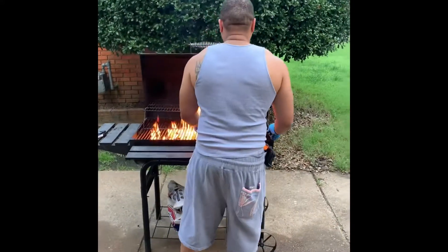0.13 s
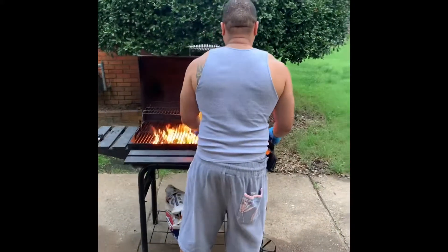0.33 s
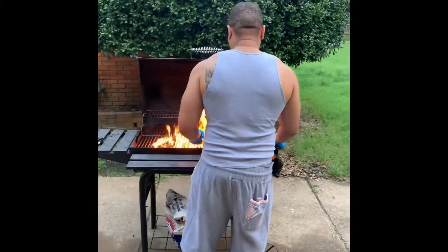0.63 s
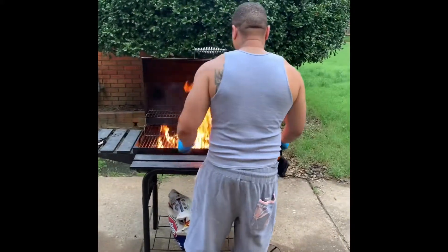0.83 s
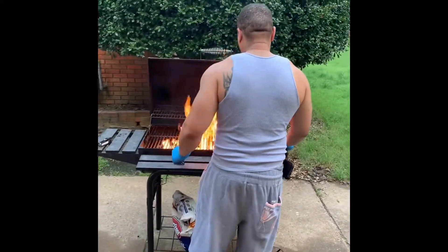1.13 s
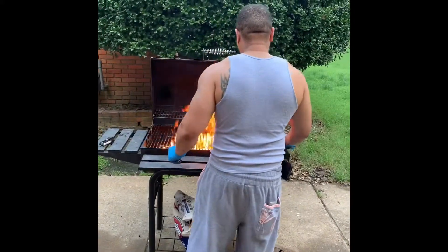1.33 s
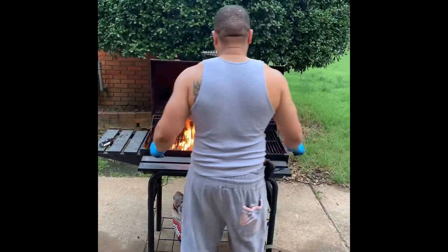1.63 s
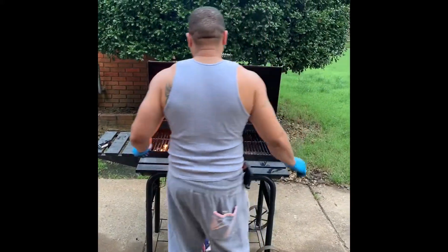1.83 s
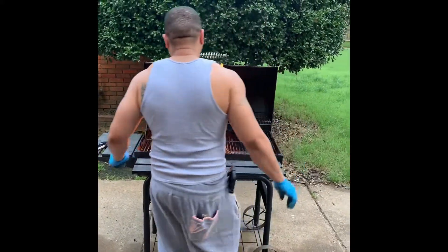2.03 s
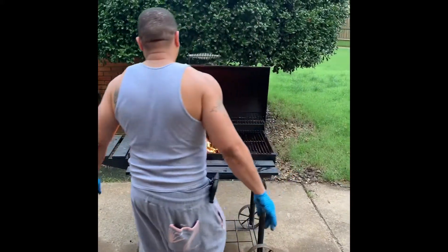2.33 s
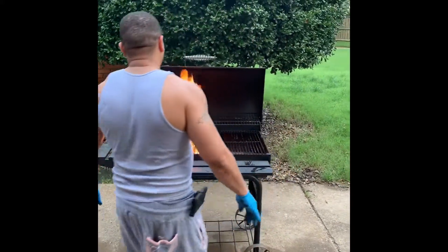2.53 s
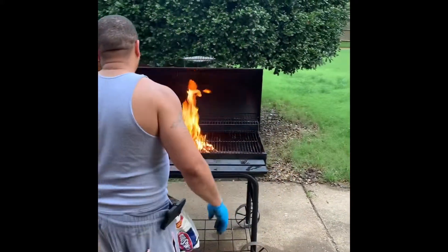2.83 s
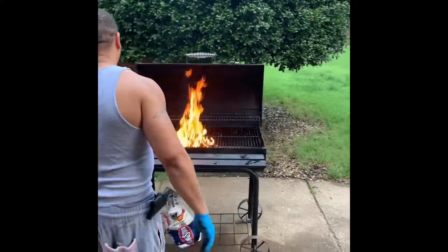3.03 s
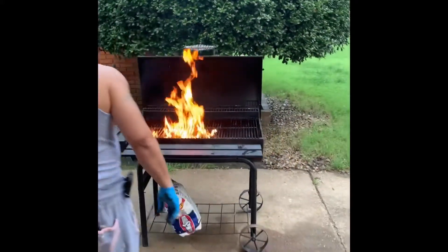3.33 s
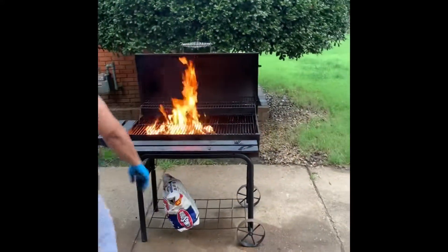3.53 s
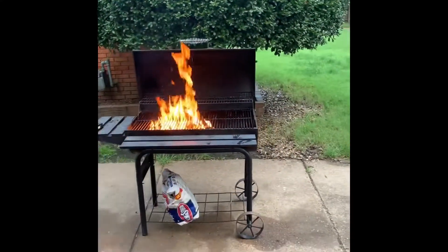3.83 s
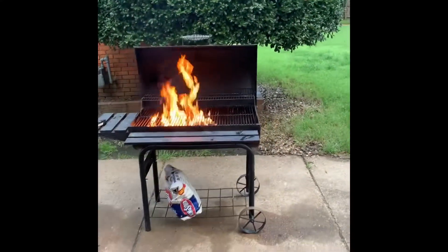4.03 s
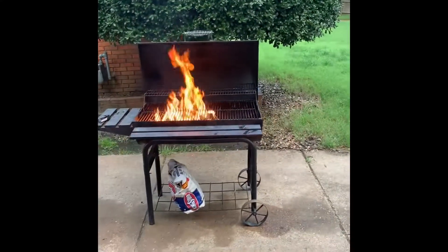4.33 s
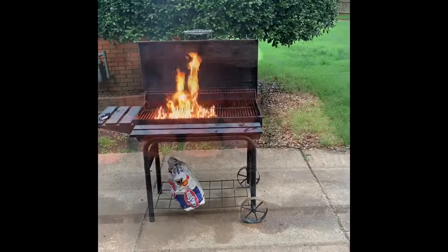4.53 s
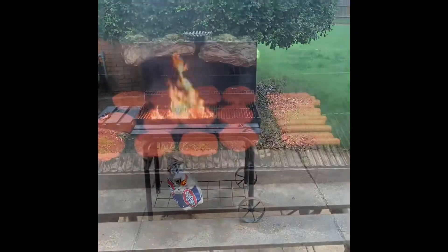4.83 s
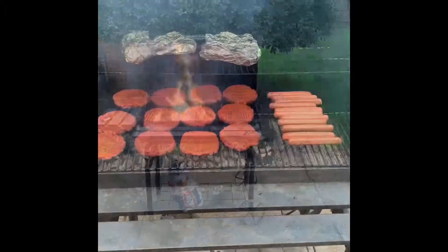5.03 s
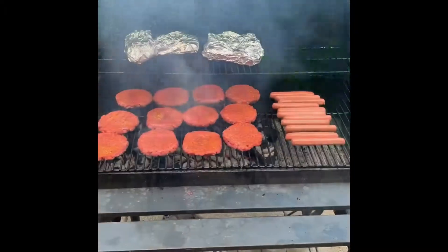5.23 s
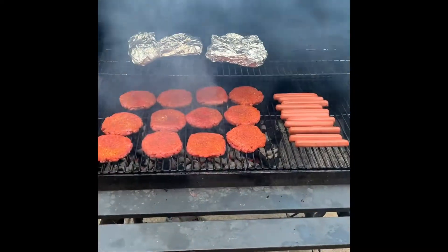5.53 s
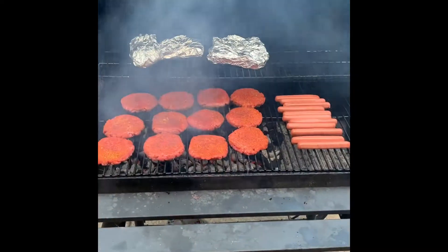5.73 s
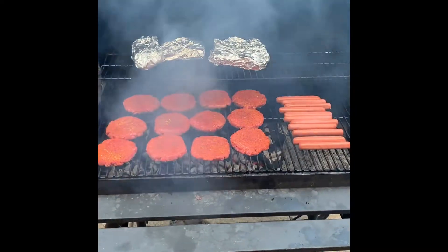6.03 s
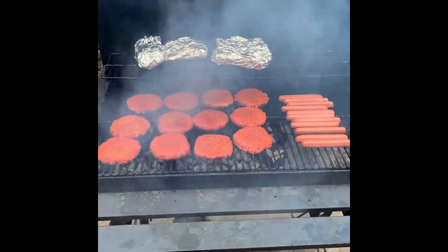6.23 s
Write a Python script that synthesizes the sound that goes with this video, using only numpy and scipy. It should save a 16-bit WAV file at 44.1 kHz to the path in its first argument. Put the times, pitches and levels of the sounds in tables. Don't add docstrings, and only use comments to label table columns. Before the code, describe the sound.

Outdoor stereo pickup of burning charcoal: steady turbulent rush, low flutter and thin airy hiss, sparse light ticks. An early flare-up makes several hollow thumping puffs in the barrel, while a short faint whine passes. Later a distant drone creeps in. After a smooth crossfade the microphone is close to the grate, with brighter sizzling, bassier flutter, sharp coal snaps and a clear motor hum.

```python
import sys
import numpy as np
from scipy import signal
from scipy.fft import rfft, irfft, next_fast_len
from scipy.io import wavfile
from scipy.ndimage import map_coordinates

SR = 44100
rng = np.random.default_rng(int(sys.argv[2]) if len(sys.argv) > 2 else 0)


def dump(signal):
    limited = np.clip(np.atleast_2d(signal).T, -1, 1)
    pcm = np.round(limited * 32767).astype(np.int16)
    wavfile.write(sys.argv[1], SR, pcm)


def attenuation_scalar(level_db):
    decades = np.asarray(level_db, float) / 20
    return 10 ** decades


N = 281737
TIME = np.arange(N) / SR
PADDED = next_fast_len(N + SR // 4)
HZ = np.arange(PADDED // 2 + 1) * SR / PADDED + 1e-3


def rms_one(x):
    return x / np.sqrt(np.mean(x ** 2) + 1e-20)


def in_time(rows):
    s, *columns = np.transpose(rows)
    return [np.interp(TIME, s, c) for c in columns]


def spell(start_s, end_s, rise_s, fall_s):
    end_s = max(end_s, start_s + 1e-4)
    return np.interp(TIME, [start_s - rise_s, start_s, end_s, end_s + fall_s], [0, 1, 1, 0])


def colour(spectrum):
    hz, db = np.transpose(spectrum)
    return attenuation_scalar(np.interp(np.log(HZ), np.log(hz), db, right=-150))


def filtered(x, gain):
    return irfft(rfft(x, PADDED) * gain, PADDED)[..., :N]


def drift(rate):
    r = np.exp(-80 * np.pi * rate / SR)
    slow = signal.lfilter([1], [1, -2 * r, r * r], rng.standard_normal(N // 40 + 2002))[2000:]
    return np.interp(np.arange(N) / 40, np.arange(len(slow)), rms_one(slow))


def resonate(x, hz, width_hz):
    r = np.exp(-np.pi * width_hz / SR)
    poles = [1, -2 * r * np.cos(2 * np.pi * hz / SR), r * r]
    return signal.lfilter([(1 - r * r) / 2, 0, (r * r - 1) / 2], poles, x)


def resonate_twice(x, hz, width_hz):
    return resonate(resonate(x, hz, width_hz), hz, width_hz)


def oscillate(hz):
    return np.sin(2 * np.pi * np.cumsum(hz) / SR)


def white():
    return rng.standard_normal((2, N))


def patches(shape, size):
    coarse = rng.standard_normal([int(n / k) + 3 for n, k in zip(shape, size)])
    axes = [np.arange(n) / k for n, k in zip(shape, size)]
    return rms_one(map_coordinates(coarse, np.meshgrid(*axes, indexing="ij"), order=1))


def turbulence(source, spectrum, patchy_db, eddy_db):
    frame = 1024
    hz, _, cells = signal.stft(source, SR, nperseg=frame)
    shape, step_s = cells.shape[1:], frame / 2 / SR
    wide = patches(shape, (8.0, 0.21 / step_s)) + patches(shape, (12.0, .05 / step_s))
    eddies = patches(shape, (90.17 / hz[1], .03 / step_s))
    db = patchy_db * wide + eddy_db * eddies
    mottled = signal.istft(cells * attenuation_scalar(db), SR, nperseg=frame)[1][:, :N]
    return rms_one(filtered(mottled, colour(spectrum)))


# time in seconds, pitch in Hz, level in dB.
MOTOR_DRONE = [(2.3, 91.1, -45), (2.75, 92, -45), (4.4, 91.84, -42.5), (4.7, 91.8, -49), (4.85, 99, -45),
               (5.02, 98, -37), (5.2, 97.83, -33), (5.4, 97.5, -31.5), (5.66, 96.9, -31), (5.7, 97, -44),
               (5.75, 97.73, -31), (6.39, 97.17, -30.5)]
# start in seconds, end in seconds, level in dB.
WHINE_SPELLS = [
    (.45, .76, -51),
    (2.3, 3.678, -57),
]
# multiple of the shaft rate, level in dB.
SHAFT_ORDERS = [(41, -63), (42, -64), (43, -71), (56, -74), (61, -78), (81, -80), (83, -79), (86, -76),
                (89, -78), (91, -76), (92, -78)]
# centre in Hz, width in Hz, far level in dB, close level in dB.
STEADY_WHINES = [
    (59.6, 7.4, -50.5, -42),
    (534.1, 13, -74, -62),
    (195.4, 24, -80, -43.5),
    (237.3, 27.6, -53, -52),
    (131.8, 18, -62, -49),
]


def motor(closer):
    shaft_hz, rest_db, scatter_lag = 58.76, -60, 113
    drone_hz, drone_db = in_time(MOTOR_DRONE)
    swell = np.interp(TIME, [2.1, 2.5], [0, 1])
    tones = attenuation_scalar(drone_db + 0.5 + 0.49 * drift(17)) * swell * oscillate(drone_hz)

    far_hz = 521 + 4.99 * drift(1.45)
    far_db = rest_db + sum((db - rest_db) * spell(a, b, 0.096, 0.046) for a, b, db in WHINE_SPELLS)
    tones += attenuation_scalar(far_db - 2.5 + 2.5 * drift(12)) * (1 - closer) * oscillate(far_hz)
    near_hz = 535.4 + 2.5 * drift(7.7)
    tones += attenuation_scalar(-55 + 1.7 * drift(6.8)) * closer * oscillate(near_hz)
    for multiple, order_db in SHAFT_ORDERS:
        order = np.sin(2 * np.pi * multiple * shaft_hz * TIME)
        tones += attenuation_scalar(order_db + 2.6 * drift(4.3)) * closer * order

    out = np.sqrt(2) * np.array([tones, 0.42 * np.roll(tones, scatter_lag)])
    for hz, width_hz, far_db, close_db in STEADY_WHINES:
        whine = rms_one(resonate_twice(white(), hz, width_hz))
        out = out + (attenuation_scalar(far_db) * (1 - closer) + attenuation_scalar(close_db) * closer ** 3.2) * whine
    return out


# frequency in Hz, width in Hz.
BARREL_MODES = [
    (236, 30),
    (121.3, 23),
]
# time of the peak in seconds, upper boom in dB, lower boom in dB.
FLARE_PUFFS = [
    (.486, -31.5, -52),
    (.52, -38, -36),
    (.598, -25.5, -40),
    (.62, -38, -45),
    (.677, -24, -28),
    (.73, -37, -35),
    (.765, -34, -36),
    (.79, -39, -30),
]
# start in seconds, end in seconds, level in dB.
BARREL_HUMS = [
    (2.85, 2.977, -43.5),
    (3.137, 3.25, -44.5),
    (3.502, 3.65, -47),
]


def flare():
    rise_s, fall_s = 0.013, 0.012
    shapes = []
    for peak_s, *_ in FLARE_PUFFS:
        width_s = np.where(TIME < peak_s, rise_s, fall_s)
        shapes.append(np.exp(-.5 * ((TIME - peak_s) / width_s) ** 2))
    out = 0
    for (hz, width_hz), levels_db in zip(BARREL_MODES, np.transpose(FLARE_PUFFS)[1:]):
        boom = oscillate(hz + width_hz * 0.27 * drift(14.7))
        out = out + np.sqrt(2) * (attenuation_scalar(levels_db - 4.0) @ shapes) * boom
    hum = rms_one(resonate_twice(white()[0], 235, 21))
    out = out + sum(attenuation_scalar(db) * spell(a, b, .06, .06) for a, b, db in BARREL_HUMS) * hum
    return out * [[1], [.3]]


# start in seconds, peak in dB, then the low, top and bridge
# bands in relative dB.
COAL_SNAPS = [(0.2033, -31.5, -20, -2.5, 5), (0.3037, -35, -12, -6, 5), (0.7352, -39, -17, -12, -12),
              (0.7375, -30, -7, -6, -9), (1.2246, -39, -14, -16, -3), (2.4506, -46, -10, -20, -20),
              (4.9387, -41, -8, -12, -2), (4.942, -41, -19, -24, -21), (5.6864, -24.5, -14, -7, -3),
              (5.6905, -36, -12, -16, -17), (5.6964, -36, -20, -12, -16), (5.8594, -25.5, -2, -5.5, 0),
              (5.8625, -27.5, -18, -15, -14), (5.8645, -33, -7, -6, -3), (5.8675, -36, -9, -7, -5),
              (6.2572, -27.5, -11, -14, -4)]
# start in seconds, peak in dB, then the low, top and bridge bands
# in relative dB.
DRY_TICKS = [(0.559, -41, -17, -7, 2), (0.821, -38, -14, -11, -4), (1.043, -56, 8, -2, 0),
             (1.3269, -41, -6, -5, 2), (1.8332, -56, -17, -20, -17), (3.0476, -42, -8, -9, 3),
             (3.479, -47, -17, -18, -15), (3.58, -45, -17, -18, -15), (3.633, -37, -11, -9, -2),
             (4.0223, -45, -17, -12, -9), (4.673, -46, -17, -16, -13), (4.9701, -43, -17, -26, -23),
             (5.012, -43, -17, -28, -25), (5.1325, -44, -17, -28, -25), (5.1501, -43, -17, -26, -23),
             (5.211, -44, -17, -28, -25), (5.239, -36, -12, -28, -28), (5.2435, -38, -17, -28, -25),
             (5.257, -44, -17, -28, -25), (5.2859, -46, -17, -24, -21), (5.3198, -41, -17, -22, -19),
             (5.467, -36, -4, -12, -12), (5.6837, -23, -11, -13, -5), (5.6848, -26, -13, -14, -8),
             (5.6853, -28, -12, -12, -9), (5.8396, -28, -12, -17, -22), (6.2799, -44, -17, -24, -21),
             (6.2995, -41, -17, -26, -23)]
# start in seconds, level in dB, centre in Hz, width in Hz.
GRATE_TICK = (1.043, -29, 3450, 1500)


def snaps():
    snap_t60_s, tick_t60_s = .03, 0.012
    faint_top_hz, loud_db = 15780, -38.5
    edges_hz = [5800, 11500], [13500, 17500], [2500, 5800], [11000, 13500]
    main, top, low, bridge = [signal.butter(2, edges, "band", fs=SR, output="sos") for edges in edges_hz]
    faint, loud, age = np.zeros((2, N)), np.zeros((2, N)), np.arange(SR // 12) / SR
    cracks = [(*row, snap_t60_s) for row in COAL_SNAPS] + [(*row, tick_t60_s) for row in DRY_TICKS]
    for s, peak_db, low_db, top_db, bridge_db, t60_s in cracks:
        clicks = rng.standard_normal((2, len(age))) ** 3
        crumble = clicks * 0.085 * attenuation_scalar(-60 * age / t60_s) * [[1], [.6]]
        crumble[:, 0] += [3, 1.2]
        snap = attenuation_scalar(3) * signal.sosfilt(main, crumble)
        snap += attenuation_scalar(top_db + 11) * signal.sosfilt(top, crumble)
        snap += attenuation_scalar(low_db + 10) * signal.sosfilt(low, crumble)
        snap += attenuation_scalar(bridge_db) * signal.sosfilt(bridge, crumble) * [[1], [7]]
        out = loud if t60_s == snap_t60_s and peak_db > loud_db else faint
        i = round(s * SR)
        out[:, i:i + len(age)] += attenuation_scalar(peak_db) * snap[:, :N - i]

    s, db, hz, width_hz = GRATE_TICK
    burst = white()[:, :len(age)] * attenuation_scalar(db - 60 * age / 0.052)
    i = round(s * SR)
    faint[:, i:i + len(age)] += resonate_twice(burst, hz, width_hz)
    steam = rms_one(resonate_twice(white(), 6100, 6000))
    faint += attenuation_scalar(-56.5) * spell(3.727, 3.727 + 0.035, .005, .015) * steam
    below_top = HZ < faint_top_hz
    return filtered(loud, np.where(below_top, 1, attenuation_scalar(-19))) + filtered(faint, below_top)


# time in seconds, fizz level in dB.
FIZZ_LEVEL = [(0.0, -65), (0.94, -63.5), (1.9, -66), (2.17, -64.5), (3.47, -65), (3.83, -63), (4.61, -65.5),
              (4.93, -62.5), (5.48, -54.5), (5.96, -58.5), (6.39, -57.5)]
# frequency in Hz, density in dB per Hz.
SIZZLE_SPECTRUM = [(2000, -31), (3500, 1.5), (4300, -0.5), (5200, 3), (6500, 0), (8000, 0.5), (9000, -0.5),
                   (10500, -9.5), (12500, -24), (14500, -41)]
# frequency in Hz, density in dB per Hz.
AIR_SPECTRUM = [(9000, -35), (10500, -11), (12000, -6), (13500, -5.5), (15000, -3), (15650, 0), (15760, -1),
                (15800, -50)]
# start in seconds, end in seconds, change in dB.
AIR_LULLS = [
    (1.55, 2.2, -5.5),
    (4.5, 3.6, 1),
]


def fizz(closer):
    grains_per_s = 2700
    fizz_db, = in_time(FIZZ_LEVEL)
    air_db = fizz_db - 6 - 2 * closer
    air_db += sum(db * spell(a, b, .1, .35) for a, b, db in AIR_LULLS)
    air_db += 1.6 * drift(30)
    born = rng.random((2, N)) < grains_per_s * attenuation_scalar(3.0 * drift(10)) / SR
    sizes = attenuation_scalar(3.0 * np.minimum(rng.exponential(1, (2, N)), 5))
    grains = born * sizes * rng.choice([-1, 1], (2, N))
    source = (0.59 * rms_one(grains) + white()) * attenuation_scalar(0.59 * drift(13.0))
    sizzle = turbulence(source, SIZZLE_SPECTRUM, patchy_db=0.0, eddy_db=3.0)
    air = turbulence(source, AIR_SPECTRUM, patchy_db=0.5, eddy_db=3.0)
    gap_db = .5 - 10.5 * closer + 4.1 * drift(15)
    sizzle[1] += (attenuation_scalar(gap_db) - 1) * resonate(sizzle[1], 5000, 900)
    return attenuation_scalar(fizz_db + 3.0) * sizzle + attenuation_scalar(air_db + 3.0) * air


# time in seconds, rush level in dB.
FIRE_VIGOUR = [(0.0, -42), (0.16, -45.5), (0.19, -43.5), (1.85, -42), (2.12, -42), (2.94, -44.5),
               (4.29, -43.5), (4.84, -48), (5.34, -43), (5.57, -44), (6.01, -41.5), (6.39, -43)]
# time in seconds, lift in dB.
FLUTTER_GUSTS = [
    (5.14, 10.5),
    (5.4, 1),
    (5.65, 2),
    (5.86, 4),
    (6.25, 5),
]
# time in seconds, level in dB.
VENT_DRAUGHT = [(0, -52), (.5, -51), (1.0, -46.5), (1.5, -45.5), (1.8, -48.5), (2.1, -44), (2.4, -46),
                (2.8, -47.5), (3.1, -55), (3.5, -50), (3.8, -48), (4.3, -47.5), (4.6, -52), (6.39, -66)]
# time in seconds, gain in dB.
RUSH_HOLLOW = [(0, 3.5), (1.2, -1), (2, 2), (2.8, -0.5), (3.1, 0), (4, -1.5), (4.5, -2), (6.39, -3)]
# frequency in Hz, density in dB per Hz.
FLUTTER_SPECTRUM = [(18, -19), (30, -11), (45, 0), (60, -1.5), (80, -2.5), (110, -6.5), (140, -14.5),
                    (170, -37)]
ROAR_SPECTRUM = [(70, -62), (100, -1.5), (130, 0), (180, -2.5), (250, -5), (330, -8.5), (430, -15.5),
                 (600, -42)]
FAR_RUSH_SPECTRUM = [(300, -52), (450, -4.5), (650, -3.5), (900, 1.5), (1150, -0.5), (1400, -4.5),
                     (2200, -13), (3000, -18.5), (4500, -25), (6000, -48)]
CLOSE_RUSH_SPECTRUM = [(300, -32), (450, 1.5), (650, 3), (900, 2), (1300, 0.5), (1750, -5.5), (2200, -9),
                       (3000, -14), (4500, -23.5), (6000, -43)]
VENT_SPECTRUM = [(900, -33), (1300, -7), (1600, -0.5), (1850, -3), (2200, -11), (2800, -16.5), (3500, -38)]


def flames(closer):
    gust_s = 0.042
    rush_db, = in_time(FIRE_VIGOUR)
    swing_db = rush_db - rush_db.mean()
    flutter_db = -39 + 5 * closer ** 2 + (1 - closer) * swing_db
    flutter_db += sum(db * spell(s, s, gust_s, gust_s) for s, db in FLUTTER_GUSTS)
    roar_db = -41.5 + 0.5 * closer + 0.7 * swing_db
    roar_db += 4.5 * spell(0.477, 0.69, .03, 0.073)

    far = turbulence(white(), FAR_RUSH_SPECTRUM, patchy_db=0.26, eddy_db=2.5)
    close = turbulence(white(), CLOSE_RUSH_SPECTRUM, patchy_db=0.72, eddy_db=2.0)
    far = far + (attenuation_scalar(in_time(RUSH_HOLLOW)[0]) - 1) * resonate(far, 590, 270)
    rush = np.sqrt(1 - closer) * far + np.sqrt(closer) * close
    vents = attenuation_scalar(in_time(VENT_DRAUGHT)[0]) * turbulence(white(), VENT_SPECTRUM, patchy_db=0.34, eddy_db=3.5)
    flutter = rms_one(filtered(white(), colour(FLUTTER_SPECTRUM)))
    roar = rms_one(filtered(white(), colour(ROAR_SPECTRUM)))
    return attenuation_scalar(flutter_db) * flutter + attenuation_scalar(roar_db) * roar + attenuation_scalar(rush_db + 1.0) * rush + vents


# frequency in Hz, likeness 0-1, lead of the left in radians.
LOW_PORTS = [(35, .992, 0), (90, .972, 0), (180, .905, -.05), (340, .89, -.1), (520, .76, .4),
             (700, .62, .15), (1050, .81, -.25), (1600, .83, .05), (2100, .58, .5), (2500, .42, 1.9),
             (3100, .62, 2.7), (3750, .34, 2.0), (4400, .62, 2.6)]
# frequency in Hz,
# likeness 0-1, lead of the left in radians.
HIGH_PORTS = [(4750, .87, 2.9), (5200, .87, 3.25), (5600, .8, 3.9), (6400, .85, 5.2), (7200, .95, 5.85),
              (8050, .99, 6.28), (8900, .98, 6.75), (10300, .93, 7.9), (11200, .97, 8.85),
              (12100, .995, 9.42), (14000, .9, 11), (16100, .95, 12.57)]


def ports(paths):
    hz, alike, lead = np.transpose(LOW_PORTS + HIGH_PORTS)
    alike, lead = np.clip(np.interp(HZ, hz, alike), 0, 1), np.interp(HZ, hz, lead)
    direct, scattered = rfft(paths, PADDED) * [np.sqrt((1 + alike) / 2), np.sqrt((1 - alike) / 2)]
    left = (direct + scattered) * np.exp(.5j * lead)
    right = (direct - scattered) * np.exp(-.5j * lead)
    return irfft([left, right], PADDED)[:, :N]


def scene():
    fade_start_s, fade_end_s = 4.58, 5.02
    closer = spell(fade_end_s, N / SR, fade_end_s - fade_start_s, 1)
    return ports(motor(closer) + flare() + snaps() + fizz(closer) + flames(closer))


def band_limit(x):
    return signal.sosfilt(signal.butter(12, 16790, fs=SR, output="sos"), x)


def record(dry):
    mix = filtered(dry, np.clip((16790 - HZ) / 200, 0, 1))
    return band_limit(mix)


dry = scene()
out = record(dry)
dump(out)
```